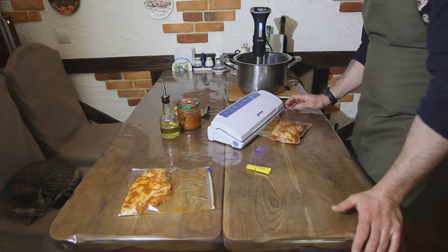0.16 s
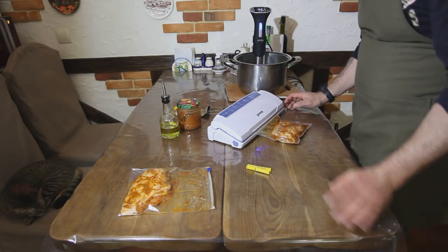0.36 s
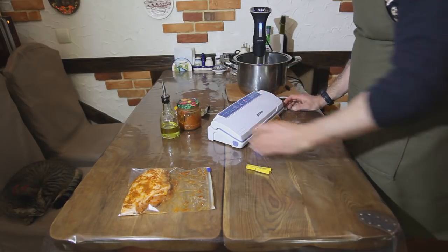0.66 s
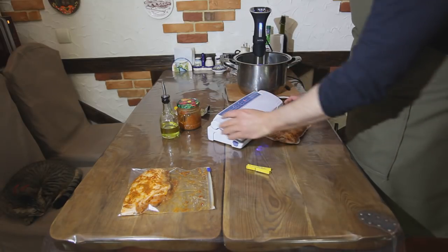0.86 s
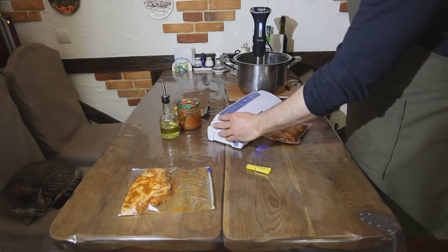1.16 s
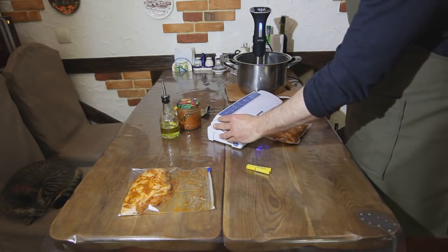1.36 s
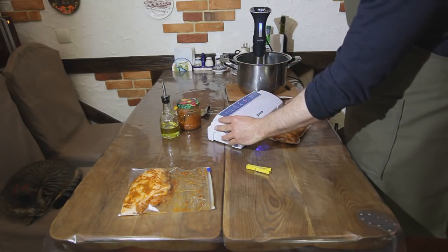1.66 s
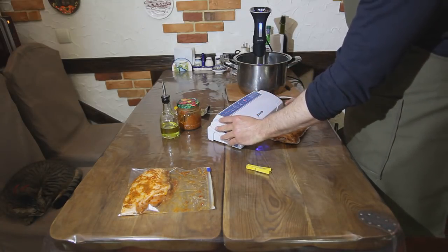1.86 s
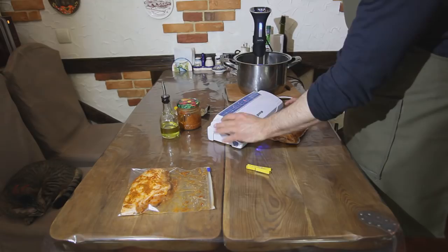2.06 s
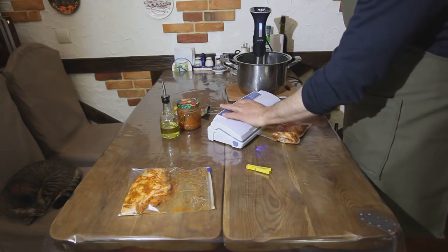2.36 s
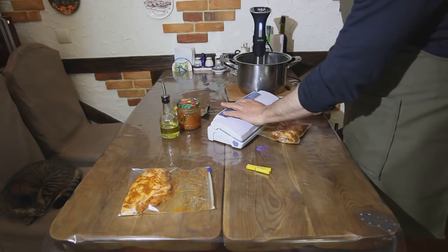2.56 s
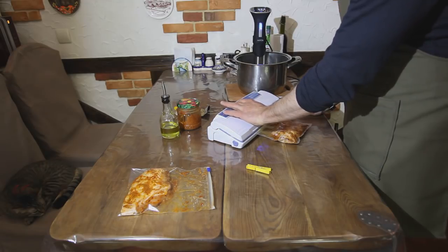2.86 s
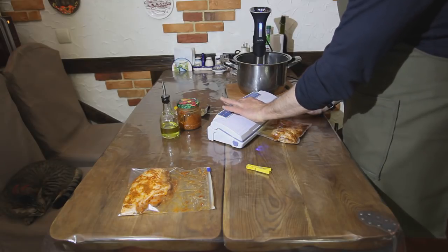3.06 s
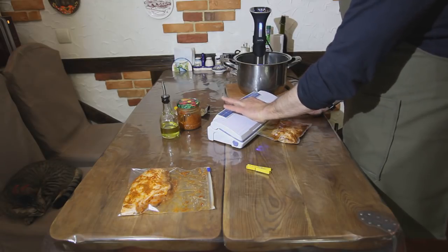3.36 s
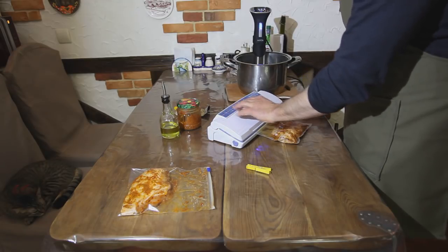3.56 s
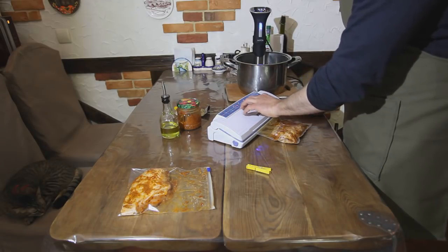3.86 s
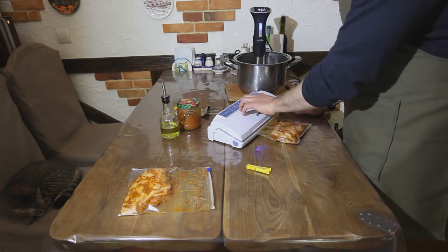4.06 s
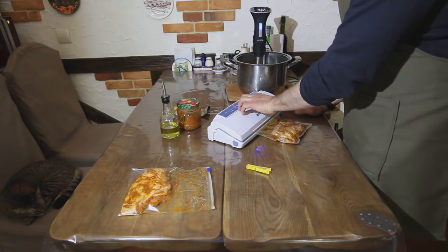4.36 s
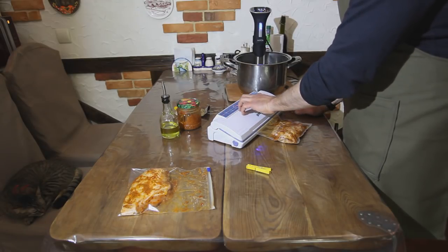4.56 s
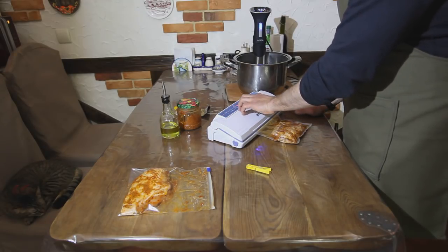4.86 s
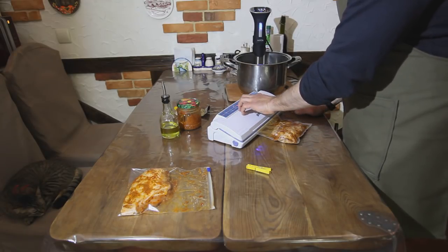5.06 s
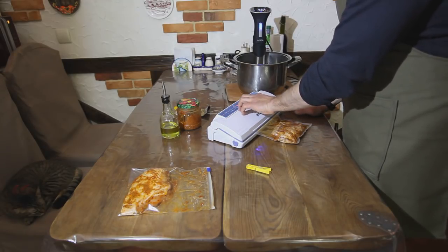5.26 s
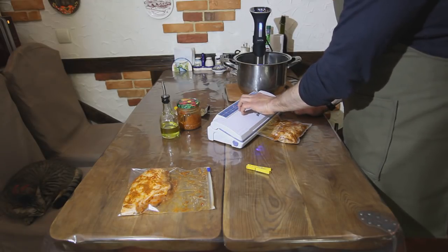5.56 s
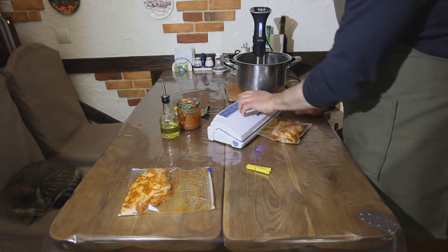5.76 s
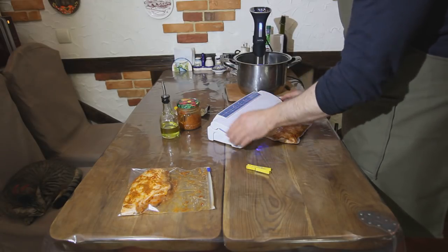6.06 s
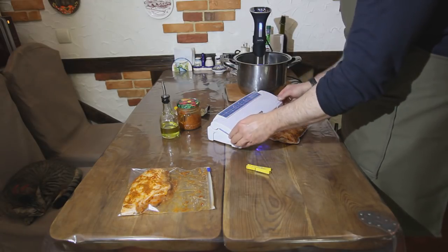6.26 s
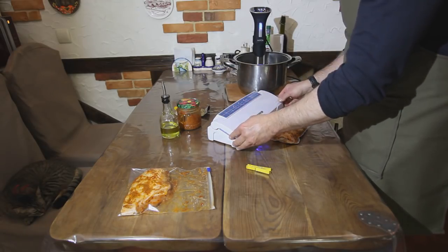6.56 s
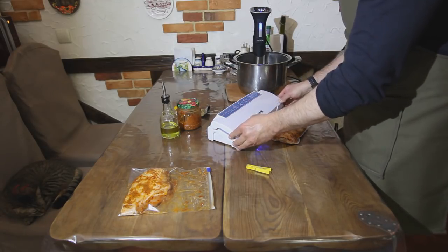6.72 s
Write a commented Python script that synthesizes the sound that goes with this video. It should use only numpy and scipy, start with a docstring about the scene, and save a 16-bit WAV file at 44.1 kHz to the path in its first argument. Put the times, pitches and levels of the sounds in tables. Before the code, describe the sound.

Buzzing countertop vacuum pump labours as a bag tightens, its case snapping, then stops abruptly; quiet stirring water and final latch clicks remain.

```python
"""Vacuum sealer and water circulator in a kitchen

A piston pump puffs and hisses freely, slows under load, then rattles regularly against the vacuum and stops.
Its drone and housing are sums of shaft-rate harmonics; its hiss, churning and reed squeaks are noise gated
by the stroke. Cracks with decaying lid modes make the case tick and snap. Behind it a circulator gives
coloured water noise and steady hums. A gain control ducks after loud moments and creeps back.
"""
import sys
import numpy as np
from scipy import signal
from scipy.fft import rfft, irfft, next_fast_len
from scipy.io import wavfile
from scipy.ndimage import uniform_filter1d, map_coordinates

SR = 44100
rng = np.random.default_rng(int(sys.argv[2]) if len(sys.argv) > 2 else 0)


def bounce(signal):
    """Save signal as a 16-bit WAV file at the path given by the first command-line argument."""
    frames = np.transpose(np.atleast_2d(signal))
    limited = np.clip(frames, -1, 1)
    pcm = np.round(limited * 32767).astype(np.int16)
    wavfile.write(sys.argv[1], SR, pcm)


N = 303849
TIME = np.arange(N) / SR

# Load on the pump [t/s, stage: 0 free air, 1 drawing, 2 bag tight, 3 full vacuum]
LOAD = [(.85, 0), (1.75, 1), (2.25, 1), (2.85, 2), (3.2, 2), (3.9, 3)]
# Source levels at stages 0-3, before PUMP_DB
# [drone level/dB, housing level/dB, hiss level/dB, reed squeak level/dB, churning air level/dB]
STAGE_LEVELS = [(-28.5, -29.5, -29.5, -24, -36), (-24.5, -27.5, -28.5, -24.5, -37),
                (-23, -19.5, -30, -27, -35), (-25.5, -22, -36, -32.5, -44)]
# Relative drone spectrum at each stage [multiple of the shaft rate, level/dB]
FREE_AIR = [(1, -37), (2, -11.5), (3, -7.5), (4, -9), (5, -22), (6, -14), (7, 1.5), (8, -5), (9, -19),
            (10, -2), (11, 3.5), (12, -9), (13, -14.5), (14, -6), (15, -0.5), (16, -2.5), (17, 2),
            (18, -8.5), (19, -18), (20, -5.5)]
DRAWING = [(1, -39), (2, -19), (3, -5.5), (4, -1.5), (5, -16), (6, -10.5), (7, 4), (8, -14.5), (9, -10),
           (10, -12), (11, -2.5), (12, -5), (13, -6), (14, -7), (15, -9), (16, -5.5), (17, -19), (18, -2.5),
           (19, -7.5), (20, -39)]
BAG_TIGHT = [(1, -28), (2, -22), (3, -6.5), (4, 4.5), (5, 2), (6, -6), (7, 0.5), (8, -4.5), (9, -42),
             (10, -5), (11, -10), (12, 0), (13, -2.5), (14, -0.5), (15, 2), (16, -5), (17, -19), (18, -1),
             (19, -35), (20, -3.5)]
FULL_VACUUM = [(1, -31), (2, -20), (3, -10), (4, -1), (5, -8), (6, -19), (7, -4.5), (8, -4), (9, -15),
               (10, -10.5), (11, -1.5), (12, 0.5), (13, 1), (14, -12.5), (15, -0.5), (16, -10.5), (17, -2),
               (18, -2.5), (19, -3), (20, -10)]
# Partials that swell and fade, Gaussian in time and order
# [centre t/s, half length t/s, multiple of the shaft rate, reach in multiples, level/dB]
SWELLS = [(.1, 0.45, 26, 4, -6.5), (0.653, 0.31, 23, .8, 14), (.65, 0.14, 44.5, 1.5, 3),
          (0.745, 0.21, 15.5, 1.2, 7), (1.18, 0.37, 11, .7, -12), (1.453, 0.29, 28.5, 1.5, 6),
          (2.05, 0.18, 46, 4, -11), (2.08, 0.2, 26, .8, 9), (2.197, 0.25, 11, .7, 3),
          (2.38, 0.31, 15, .8, 9), (2.44, 0.2, 42, 10, 2.5), (2.484, 0.16, 13, 1.2, -2.5),
          (2.624, 0.1, 28, .9, 8), (2.702, 0.12, 15.5, 1, -11), (2.687, 0.32, 8, .7, 9.5),
          (2.767, .11, 40, 14, -16), (2.948, 0.23, 13.5, .9, 6), (2.953, 0.096, 4, .8, 1.5),
          (3.54, 0.66, 44, 10, 2), (3.698, 0.73, 27, 2, -2), (2.99, 0.26, 43, 4, 1), (4.4, 0.4, 47, .7, 5),
          (5.2, 0.41, 57, 6, 4), (0.849, .3, 12, .6, 6), (0.951, 0.22, 19, .7, 11), (1.55, .22, 24, .6, 9),
          (1.651, 0.14, 17, .6, 8), (2.2, 0.14, 17, .6, 7), (2.3, 0.33, 8, .6, 6.5),
          (2.53, 0.15, 18, .6, -11), (2.55, 0.58, 6, 1.5, -3), (2.598, .14, 14, .6, -8),
          (2.63, .13, 10, .6, -6), (2.847, 0.2, 27, .6, -7), (3, 0.31, 47, .6, -21),
          (3.55, 0.44, 26, .6, 11), (3.6, .2, 48.5, 1.2, 6), (3.7, 0.3, 21, .6, 7)]
# Loose knocks in each turn while air flows
# [moment/turns, delay at full suction/turns, sway/turns, level/dB in each of the three bands]
KNOCKS = [(.1, 0.1134, 0.12, 2, -14, -6.5), (0.269, 0.2034, 0.12, 0, -15, -6),
          (.29, .14, 0.014, -7.5, -1, 1.5), (.59, .12, 0.003, -15, 1.5, -6.5),
          (.6, 0.043, 0.16, -4, -15.5, -10)]
# Centres of those three bands [f/Hz]
KNOCK_BANDS_HZ = (550, 1900, 2600)
# Hard rattle under vacuum; it sets only the phases of the partials
# [moment after the valve opens/turns, f/Hz, width f/Hz, relative level/dB]
RATTLE = [(.06, 542, 715, 1.5), (.22, 580, 810, 1.5), (.38, 640, 560, -0.5), (.12, 1300, 680, -5),
          (.255, 1450, 660, -2.5), (.26, 1960, 280, 7), (.34, 1910, 255, 12), (.17, 2510, 700, 0),
          (.41, 2390, 610, 0.5)]
# Interval over which loose knocks give way to the rattle [start t/s, end t/s]
LOCK_S = (2.55, 2.95)
# Relative resonances of the pump housing
# [f/Hz, width f/Hz, level/dB with air flowing, level/dB with the bag tight, level/dB under vacuum]
HOUSING_MODES = [(997, 160, -5.5, -11, -54), (1153, 17, -17, -3, -11.5), (1222, 23.4, 1.5, 0.5, -12),
                 (1321, 28, -2, -3.5, -7), (1580, 38, -4.5, -4.5, -6.5), (1707, 36, -4.5, -2, -20),
                 (1919, 45, 4, 2, -0.5), (2080, 30, 0, 4, -18), (2366, 43, -5, -5.5, -6.5),
                 (2540, 60, -5.5, -8.5, -13), (2745, 78, -6.5, -8.5, -13.5)]
# Relative spectrum of the air hiss [f/Hz, level/dB per Hz]
HISS_SPECTRUM = [(2400, -9.5), (3000, -0.5), (3430, 2), (3900, -1.5), (4700, 1.5), (5200, 1.5), (5550, 6),
                 (5800, -2), (6200, 3), (7500, 2), (9150, -3.5), (9550, -26), (9820, -1.5), (10100, -16),
                 (10650, -20), (11000, -7), (11550, -13), (12000, -8.5), (13500, -32), (16000, -35)]
# Relative spectrum of the churning air [f/Hz, level/dB per Hz]
CHURN_SPECTRUM = [(90, -25), (160, 2.5), (330, -2.5), (700, -2), (1100, -10), (2200, 1.5), (3200, -21)]
# Valve reeds [f/Hz, width f/Hz, relative level/dB, start/turns, extra level/dB under vacuum]
REEDS = [(3430, 59, -11.5, 0.06, 1), (6580, 440, -4.5, 0.06, 2.5), (7340, 220, 1.5, 0.26, -1),
         (7600, 180, 0.5, 0.2, -0.5), (7760, 110, -0.5, 0, 0.5), (8255, 420, 2.5, 0.05, 2),
         (8896, 180, -1.5, 0, 3.5)]
# Relative spectrum of the grating piston seal [f/Hz, level/dB per Hz]
GRATE_SPECTRUM = [(1500, -34), (2800, -18), (3020, -8), (3170, 8.5), (3270, 0), (3430, 10.5), (3600, -1.5),
                  (3900, -4.5), (4150, 5), (4330, -2), (4600, 2.5), (5100, 4), (5320, -2), (5570, 4),
                  (5820, -7), (6400, -8), (7000, -29), (12000, -44)]
# Relative spectrum of the stirred water [f/Hz, level/dB per Hz]
WATER_SPECTRUM = [(25, -50), (60, -30), (90, -16), (150, 5), (220, 3), (400, -0.5), (700, -7), (1400, -10),
                  (2800, -16.5), (4500, -18.5), (6800, -20), (9000, -33.5), (12000, -39), (16000, -45)]
# Motor hum of the circulator [f/Hz, rms level/dB, waver of level/dB]
MOTOR_HUM = [(283, -46.5, 5.3), (347.5, -47, 2.8), (440.2, -41, 2.6), (484, -49.5, 2.8), (701, -53.5, 1.6)]
# Snaps and ticks of the plastic case; the last four levels are relative to the first
# [t/s, level/dB, thump level/dB, body level/dB, treble level/dB, lid ring level/dB]
CLICKS = [(0.268, -12.5, -19, -9, -1, -18), (2.218, -11.5, -18, -1, 3.5, -17),
          (2.892, -15, -12.5, -8, 4, -20), (3.111, 5, -9, -7, 1, -15), (3.308, -8, -9, 0, -12.5, -13),
          (5.328, -3, -5, 4.5, -7.5, -19), (5.368, -19, -1, 4, -15, -18), (5.545, -27, -15, 5, -2, -5),
          (5.627, -27, -2, 3, 0, -20), (5.641, -14.5, -11, 4, -6, -10), (5.657, -23, -13, 9, -10, -6.5),
          (6.068, -34, -22, -10, -1, -20), (6.348, -22.5, -8, -7, -12, -4.5),
          (6.446, -22, -13, -4.5, -7, -6), (6.518, -24.5, -18, -10, -6, -7), (6.569, -26, -12, -5, -9, -5),
          (6.6176, -11.5, -10, -1, -1.5, -24), (6.6583, 1.5, 0, -0.5, -7.5, -17),
          (6.6655, -7, -3, 5, 8, -17)]
# Spectrum of the crack in a snap [f/Hz, level/dB per Hz]
SNAP_SPECTRUM = [(25, -40), (60, -26), (150, -3), (570, 1), (840, -8), (1120, -0.5), (1600, -2.5),
                 (2050, -6.5), (2470, -3), (3200, -8.5), (3900, -4), (5300, -5), (6500, -4), (8500, -12),
                 (10500, -23.5), (16000, -27)]
# Modes the snap leaves ringing in the lid [f/Hz, relative level/dB, 60 dB decay t/s]
LID_MODES = [(594, -2.5, 0.079), (735, -4, .07), (884, -6.5, 0.053), (1115, -5, 0.044), (1475, -10, 0.043),
             (1708, -8, 0.089), (2030, -7, 0.044), (2666, -2, 0.042), (2780, -6.5, 0.034),
             (3060, -4.5, 0.037), (4020, -13, 0.06), (6350, -10.5, 0.071)]
# Reverberation of the kitchen [f/Hz, 60 dB decay t/s]
KITCHEN_DECAY = [(150, 0.4), (1000, 0.48), (4000, 0.39), (7000, 0.23), (12000, 0.034)]

# Motor cut: time, fall of the pump's level, e-folding time of the shaft rate; overall pump trim
STOP_S, RUN_DOWN_DB_PER_S, COAST_S, PUMP_DB = 5.335, 225, .38, 4
# Shaft rate (turns per s): it falls ever faster, picks up once the bag is tight, then sags
FREE_HZ, DRAG_HZ, DRAG_POWER, TIGHT_S = 47.48, 2.35, 1.33, 2.93
PICK_UP_HZ, PICK_UP_S, SAG_HZ_PER_S = .65, 1.4, .1
START_TURN = .35  # where the piston starts
SUCTION_S, SUCTION_RISE_S = 1.7, 2.3  # onset of the pressure drop and its time constant
PUFF_TURN, PUFF_DELAY_TURNS = -.07, .51  # valve opening, and its delay at full suction
SWAY_S = 2.3  # the loose knocks slide later and back within this time
# Under full vacuum the strokes keep hardening
STRAIN_DRONE_DB_PER_S, STRAIN_HISS_DB_PER_S = 2, 2.3
CHUG_DB, CHUG_TURN = 1, .28  # under vacuum the housing peaks this long after the valve opens
GRATE_DB, GRATE_TURN = -32.5, .11  # level at full suction; start after the valve opens
WATER_DB = -35.5
MAINS_HZ, MAINS_DB = 99.8, -49
CUTOFF_HZ = 16000


def from_db(db):
    """Decibel law: 20 dB is a factor of ten in amplitude."""
    return 10 ** (np.asarray(db) / 20)


def rms_one(x):
    """Normalisation to unit root-mean-square amplitude."""
    return x / np.sqrt(np.mean(x ** 2) + 1e-20)


def at_hz(points, hz):
    """Interpolation on a logarithmic frequency axis."""
    f, value = np.transpose(points)
    return np.interp(np.log(np.maximum(hz, 1)), np.log(f), value)


def colour(x, spectrum):
    """Minimum-phase filtering: a folded cepstrum gives a causal response with the given spectrum."""
    size = 2 * next_fast_len(len(x) // 2 + 4096)
    level_db = at_hz(spectrum, np.fft.rfftfreq(size, 1 / SR))
    cepstrum = irfft(np.log(from_db(level_db)))
    cepstrum[1:size // 2] *= 2
    cepstrum[size // 2 + 1:] = 0
    response = np.exp(rfft(cepstrum))
    return irfft(rfft(x, size) * response)[:len(x)]


def resonate(x, hz, width):
    """Two-pole resonance with unit gain at its peak."""
    r = np.exp(-np.pi * width / SR)
    zeros = np.array([1, 0, -1]) * (1 - r * r) / 2
    poles = [1, -2 * r * np.cos(2 * np.pi * hz / SR), r * r]
    return signal.lfilter(zeros, poles, x)


def noise():
    """White noise: equal mean power per hertz."""
    return rng.standard_normal(N)


def drift(per_s, size):
    """Slow random modulation of spread about 1: a spline through random knots spans the scene."""
    knots = rng.standard_normal(400)
    place = np.linspace(0, N / SR, size) * per_s + rng.random()
    return map_coordinates(knots, [place], order=3, mode="mirror")


def burst(t, crack_s):
    """Impulsive excitation: a flat spectrum with the phases of decaying noise, then a gentle fade."""
    rough = rng.standard_normal(len(t)) * np.exp(-t / crack_s)
    flat = irfft(np.exp(1j * np.angle(rfft(rough))), len(t))
    return flat * np.exp(-t / (10 * crack_s))


def kitchen(x, wet_db):
    """Diffuse reverberation: exponentially decaying noise bands, dying soonest in the high treble."""
    t = TIME[:SR // 2]
    edges = np.geomspace(60, 18000, 11)
    tail = 0
    for low, high in zip(edges, edges[1:]):
        band_pass = signal.butter(2, [low, high], "band", fs=SR, output="sos")
        band = signal.sosfilt(band_pass, rng.standard_normal(len(t)))
        decay_s = at_hz(KITCHEN_DECAY, np.sqrt(low * high))
        tail = tail + band * from_db(-60 * t / decay_s)
    tail = tail * np.clip(t / .0035 - .5, 0, 1)  # short gap, then a fade-in
    wet = signal.fftconvolve(x, tail / np.linalg.norm(tail))[:N]
    return x + from_db(wet_db) * wet


def suction(t):
    """Exponential evacuation: depth of the vacuum, 0-1."""
    return 1 - np.exp(-np.maximum(t - SUCTION_S, 0) / SUCTION_RISE_S)


def valve_delay(t):
    """Valve timing: the deeper the vacuum, the later in the turn (in turns) it opens."""
    return PUFF_TURN + PUFF_DELAY_TURNS * suction(t)


def shaft_speed():
    """Motor under load: turns per second while powered."""
    drag = DRAG_HZ * np.minimum(TIME / TIGHT_S, 1) ** DRAG_POWER
    pick_up = PICK_UP_HZ * np.sin(np.pi / 2 * np.clip((TIME - TIGHT_S) / PICK_UP_S, 0, 1))
    sag = SAG_HZ_PER_S * np.maximum(TIME - TIGHT_S - PICK_UP_S, 0)
    return FREE_HZ - drag + pick_up - sag


def stroke(turns, rise, fall, rest, uneven_db):
    """Pulsating flow: each turn swells and falls (times in turns) with its own random strength."""
    turn, part = np.floor(turns).astype(int), turns % 1
    strength = from_db(uneven_db * rng.standard_normal(turn.max() + 2))[turn]
    pulse = strength * (1 - np.exp(-part / rise)) * np.exp(-part / fall)
    return np.hypot(rest, pulse)


def pump():
    """Periodic excitation: one stroke per turn drives all sources; they run down when the motor is cut."""
    stage = np.interp(TIME, *np.transpose(LOAD))
    drone_db, ring_db, hiss_db, squeak_db, churn_db = (
        np.interp(stage, np.arange(len(db)), db) for db in np.transpose(STAGE_LEVELS))
    vacuum = np.clip(stage - 2, 0, 1)
    straining = np.maximum(np.minimum(TIME, STOP_S) - LOAD[-1][0], 0)
    coasting = np.maximum(TIME - STOP_S, 0)

    speed = shaft_speed() * np.exp(-coasting / COAST_S)
    turns = np.cumsum(speed) / SR + START_TURN
    valve_turns = turns - valve_delay(TIME)

    hum = from_db(drone_db + STRAIN_DRONE_DB_PER_S * straining) * drone(turns, stage)
    chug_db = CHUG_DB * vacuum * np.cos(2 * np.pi * (valve_turns - CHUG_TURN))
    ring = from_db(ring_db + chug_db) * housing(turns, speed, stage)
    hiss = from_db(hiss_db + STRAIN_HISS_DB_PER_S * straining) * air_hiss(valve_turns, vacuum)
    churn = from_db(churn_db) * churning_air(turns)
    squeak = from_db(squeak_db) * reeds(valve_turns, vacuum)

    running = from_db(PUMP_DB - RUN_DOWN_DB_PER_S * coasting)
    solid = running * (hum + ring + grating(valve_turns))
    airy = running * (hiss + churn + squeak)
    return solid + kitchen(airy, wet_db=-6.5)


def loose_knocks(k, t, scatter, waver_rad):
    """Phasor sum: wandering knocks reinforce or cancel in harmonic k, so it beats."""
    swing = np.sin(np.pi * np.minimum(t / SWAY_S, 1))
    total = 0
    for turn, delay, sway, *levels in KNOCKS:
        strength = from_db(np.interp(k * FREE_HZ, KNOCK_BANDS_HZ, levels))
        moment = turn + delay * suction(t) + sway * swing
        total = total + strength * np.exp(-2j * np.pi * k * moment)
    return total * np.exp(1j * (scatter + waver_rad * drift(3.87, len(t))))


def hard_rattle(k, t):
    """Phase locking: fixed moments after the valve opens give harmonic k a regular phase."""
    loaded_hz = k * (FREE_HZ - DRAG_HZ)
    total = 0
    for turn, hz, width, db in RATTLE:
        resonance = from_db(db) / (1 + 2j * (loaded_hz - hz) / width) ** 2
        total = total + resonance * np.exp(-2j * np.pi * k * (turn + valve_delay(t)))
    return total / abs(total)


def partial(k, turns, scatter=0, fade=.057, waver_db=1.5, waver_rad=.35):
    """Fourier component k of the shaft rate, passing from loose knocks to a locked rattle."""
    t = TIME[::256]  # slow controls need few points
    locked = np.interp(t, LOCK_S, [0, 1])
    knocks = (1 - locked) * loose_knocks(k, t, scatter, waver_rad) + locked * hard_rattle(k, t)
    swell_db = sum(db * np.exp(-((t - s) / half) ** 2 - ((k - multiple) / reach) ** 2)
                   for s, half, multiple, reach, db in SWELLS)
    level_db = swell_db + waver_db * (1.5 - locked) * drift(4.97, len(t))
    # Near 1 except where the knocks almost cancel
    beating = abs(knocks) / np.hypot(abs(knocks), fade)
    gain = np.interp(TIME, t, from_db(level_db) * beating)
    phase = np.interp(TIME, t, np.unwrap(np.angle(knocks)))
    return gain * np.cos(2 * np.pi * k * turns + phase)


def drone(turns, stage, slack=.85):
    """Harmonic series: low multiples of the shaft rate shift their balance with the load."""
    stages = [np.transpose(table) for table in (FREE_AIR, DRAWING, BAG_TIGHT, FULL_VACUUM)]
    out, power = 0, 0
    for k in range(1, len(FULL_VACUUM) + 1):
        stage_gains = from_db([np.interp(k, *levels) for levels in stages])
        gain = np.interp(stage, np.arange(len(stages)), stage_gains)
        out = out + gain * partial(k, turns, slack * rng.standard_normal())
        power = power + gain ** 2 / 2
    return out / np.sqrt(power)


def housing(turns, speed, stage):
    """Forced resonance: housing modes weight the shaft harmonics, with some noisy chatter."""
    hz, width, *levels = np.transpose(HOUSING_MODES)
    grid = np.linspace(800, 3400, 600)
    detune = 2 * (grid[:, None] - hz) / width
    responses = [np.sqrt(1 / (1 + detune ** 2) @ from_db(db) ** 2) for db in levels]
    shares = [np.interp(stage, [1, 2, 3], row) for row in np.eye(len(levels))]
    scatter = .74 * rng.standard_normal(size=80)  # phase spread of the loose knocks (rad)
    out, power = 0, 0
    for k in range(21, 65):
        gain = sum(share * np.interp(k * speed, grid, response)
                   for share, response in zip(shares, responses))
        out = out + gain * partial(k, turns, scatter[k])
        power = power + gain ** 2 / 2
    regular = out / np.sqrt(power)

    strokes = stroke(turns - valve_delay(TIME) - .1, rise=.073, fall=.6, rest=.43, uneven_db=-7.0)
    chatter = noise() * strokes
    loose = rms_one(sum(from_db(db) * resonate(chatter, f, w) for f, w, db in zip(hz, width, levels[1])))
    rough = np.interp(stage, [2, 3], [.2, .17])
    return np.sqrt(1 - rough ** 2) * regular + rough * loose


def air_hiss(turns, vacuum, size=960):
    """Modulated turbulence: fresh noise plus a rasp repeated each turn, dominant under vacuum."""
    rasp = np.interp(turns % 1 * size, np.arange(size), rng.standard_normal(size))
    repeating = np.interp(vacuum, [0, 1], [.45, .75])
    flow = repeating * rms_one(rasp) + np.sqrt(1 - repeating ** 2) * noise()
    puffs = flow * stroke(turns, rise=.04, fall=.22, rest=.13, uneven_db=1)
    return rms_one(colour(puffs, HISS_SPECTRUM))


def churning_air(turns):
    """Pulsating flow noise: even strokes gate noise of a low, broad colour."""
    gulps = noise() * stroke(turns, rise=.049, fall=.82, rest=.49, uneven_db=0)
    return rms_one(colour(gulps, CHURN_SPECTRUM))


def reeds(turns, vacuum):
    """Resonant valves: each reed rings from its own puffs of noise, at its own moment of the stroke."""
    out = 0
    for hz, width, db, start, vacuum_db in REEDS:
        puffs = noise() * stroke(turns - start, rise=.031, fall=.15, rest=.024, uneven_db=2.5)
        squeak = resonate(resonate(puffs, hz, width), hz, 2400)
        out = out + from_db(db + vacuum_db * vacuum) * rms_one(squeak)
    return rms_one(out)


def circulator(waver_rad=.74):
    """Broadband and tonal sources: stirred water, wavering motor hum and a steady mains tone."""
    water = from_db(WATER_DB) * rms_one(colour(noise(), WATER_SPECTRUM))
    hum = 0
    for hz, db, waver_db in MOTOR_HUM:
        gain = from_db(db + waver_db * drift(13, N))
        hum = hum + gain * np.sin(2 * np.pi * hz * TIME + waver_rad * drift(8, N))
    mains = from_db(MAINS_DB) * np.sin(2 * np.pi * MAINS_HZ * TIME)
    return water + np.sqrt(2) * (hum + mains)  # sqrt(2): rms to peak


def clicks(crack_s):
    """Impulse response: a crack of a few milliseconds leaves the lid's modes decaying."""
    out, t = np.zeros(N + SR), TIME[:SR // 3]
    for s, db, thump_db, body_db, treble_db, ring_db in CLICKS:
        crack = colour(burst(t, crack_s), SNAP_SPECTRUM)
        crack = crack / np.linalg.norm(crack) * np.sqrt(SR * crack_s / 2)
        ring = 0
        for hz, level, t60 in LID_MODES:
            mode = from_db(level - 60 * t / t60) * np.sin(2 * np.pi * hz * t)
            ring = ring + mode * rng.choice([-1, 1])
        tilt = [(300, thump_db), (680, body_db), (1100, 0), (2700, 0), (5000, treble_db)]
        at = round(s * SR)
        out[at:at + len(t)] += from_db(db) * colour(crack + from_db(ring_db) * ring, tilt)
    return kitchen(out[:N], wet_db=-4.0)


def grating(turns, size=960, scrape_s=.0092):
    """Periodic friction: the piston seal repeats one short scrape each turn, louder with suction."""
    scrape = burst(TIME[:size], scrape_s)
    grit = np.interp((turns - GRATE_TURN) % 1 * size, np.arange(size), scrape)
    return from_db(GRATE_DB) * suction(TIME) * rms_one(colour(grit, GRATE_SPECTRUM))


def scene():
    """Superposition of pump, case snaps and circulator in one channel."""
    return (pump() + clicks(crack_s=.003) + circulator())[None]


def gain_control(x, limit_db, attack_s, release_db_per_s):
    """Automatic gain control: loud moments pull the gain down; it creeps back at a steady rate."""
    power = uniform_filter1d(x[0] ** 2, size=441)  # 10 ms mean
    level = 10 * np.log10(np.maximum(power, 1e-12))
    creep = release_db_per_s * TIME
    cut = np.maximum.accumulate(np.maximum(level - limit_db, 0) + creep) - creep
    r = np.exp(-1 / (attack_s * SR))
    # The smoothed cut starts from PUMP_DB
    smooth_cut = signal.lfilter([1 - r], [1, -r], cut, zi=[PUMP_DB * r])[0]
    return x * from_db(-smooth_cut)


def record(dry):
    """Limited channel: gain control, clipping at full scale and a steep elliptic low-pass."""
    held = gain_control(dry, limit_db=-18.0, attack_s=.032, release_db_per_s=16.5)
    clipped = np.clip(held, -1, 1)
    top_cut = signal.ellip(10, .2, 80, CUTOFF_HZ, fs=SR, output="sos")
    return signal.sosfilt(top_cut, clipped)


dry = scene()
out = record(dry)
bounce(out)
```